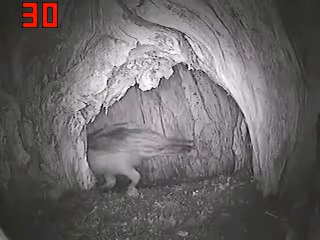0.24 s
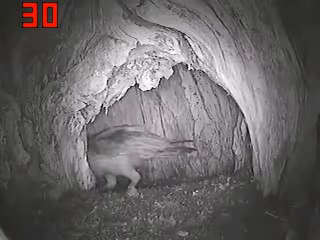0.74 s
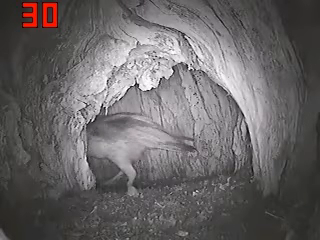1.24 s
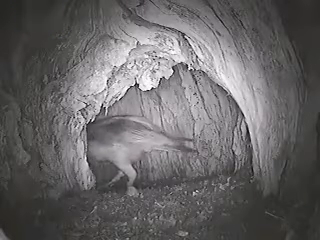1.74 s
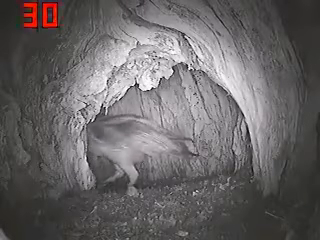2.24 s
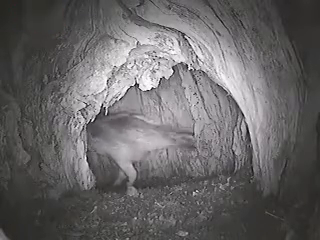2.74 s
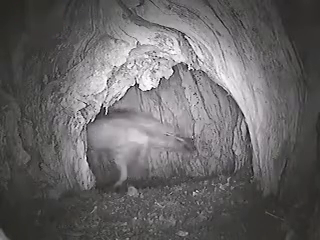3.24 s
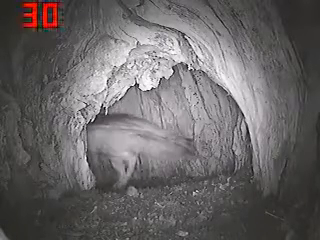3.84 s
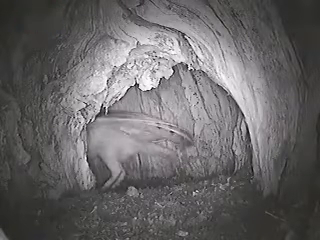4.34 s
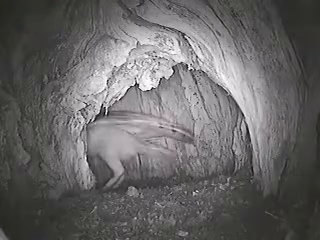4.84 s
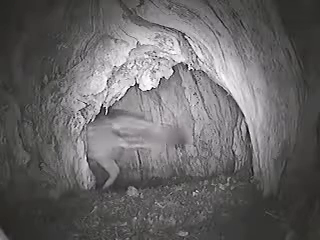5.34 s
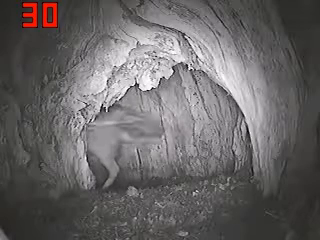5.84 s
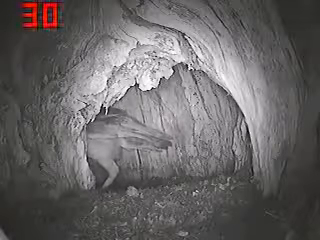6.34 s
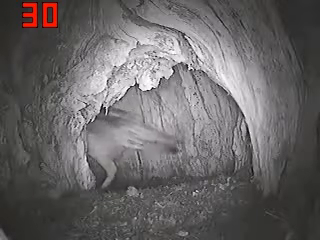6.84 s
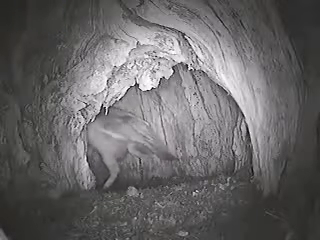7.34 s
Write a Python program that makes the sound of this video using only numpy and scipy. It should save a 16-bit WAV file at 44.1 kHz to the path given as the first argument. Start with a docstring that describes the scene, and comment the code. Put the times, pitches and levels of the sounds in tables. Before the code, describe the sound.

Inside a hollow tree, two barn owls beg with harsh, raspy hisses, picked up closely by a small camera microphone with limited treble and slightly squashed peaks. A hiss is already under way at the start and ends by about 0.3 seconds. Loud and soft owls hiss nearly together at 0.8 and 1.9 seconds, each call about half a second, swelling and brightening before stopping abruptly. The thinner owl leads at 2.9, overlapped by the loud one at 3.2. From about 3.6 to 5 seconds the sound turns hollow and whistly, with thin sliding tones, strongest around 4.4 to 4.9 during another overlapping pair. The soft owl hisses alone at 5.2, the loud one at 6.1 with the soft overlapping from 6.3, and a last loud hiss starts at 7.3. A short woody tail follows each; a low, watery, flickering hush with faint hum fills the gaps.

```python
"""Two barn owls begging in a hollow tree

Two barn owls beg with harsh hisses, made of noise shaped by throat resonances, near a small nest camera.
The louder owl's hisses swell as its resonances rise; a softer, thinner owl overlaps and follows.
For a while the hisses sound hollow and whistly, with thin tones, some sliding. The wooden hollow adds
a short tail to the hisses. Filtered noise hushes behind them with a trace of hum, and the camera's
input flattens the loudest peaks."""
import sys
import numpy as np
from scipy import signal
from scipy.io import wavfile
from scipy.ndimage import uniform_filter1d

SR = 44100
rng = np.random.default_rng(int(sys.argv[2]) if len(sys.argv) > 2 else 0)


def store_wav(level_fs):
    """Save 16-bit WAV to argv[1]."""
    pcm = np.round(np.clip(np.atleast_2d(level_fs), -1, 1) * 32767)
    wavfile.write(sys.argv[1], SR, pcm.T.astype(np.int16))


N = 334278  # length in samples
FRAME, HOP = 2048, 512  # samples per slice of sound, and samples from one slice to the next
FRAME_S = np.arange(N // HOP + 3) * HOP / SR
BIN_HZ = np.fft.rfftfreq(FRAME, 1 / SR)
SHOULDER_HZ, EDGE_HZ = 7300, 8010  # where the treble drops to a faint shoulder, and where it ends


def gain_of(db):
    """Decibels to amplitude."""
    return 10 ** (np.asarray(db) / 20)


def evened(x):
    """Scales to an rms of 1."""
    return x / np.sqrt(np.mean(x ** 2) + 1e-20)


def read(points, hz):
    """A curve in dB over pitch, joined on a log-frequency axis."""
    point_hz, db = np.transpose(points)
    return np.interp(np.log(hz + 1), np.log(point_hz + 1), db)


def curve(points, t):
    """A control curve, joined by straight lines in time."""
    return np.interp(t, *np.transpose(points))


def wobble(count, size):
    """Smooth random drift of rms 1: noise averaged twice over `size` points."""
    noise = rng.standard_normal(count)
    return evened(uniform_filter1d(uniform_filter1d(noise, size), size))


def patches(abruptness, rarity):
    """Narrow patches of pitch that switch on (+1) and off (-1) at random (frames x bins)."""
    field = rng.standard_normal((len(FRAME_S), len(BIN_HZ)))
    field = uniform_filter1d(field, size=7, axis=0)
    field = evened(uniform_filter1d(field, size=3, axis=1))
    return np.tanh(abruptness * (field - rarity))


def turbulence(colour):
    """Noise of even power whose spectrum follows colour (frames x bins)."""
    white = rng.standard_normal((len(FRAME_S) - 1) * HOP)
    slices = signal.stft(white, nperseg=FRAME, noverlap=FRAME - HOP)[2]
    colour = colour / np.sqrt(np.mean(colour ** 2, axis=1, keepdims=True))
    return signal.istft(slices * colour.T, nperseg=FRAME, noverlap=FRAME - HOP)[1][:N]


def add(mix, s, sound):
    """Mixes a sound in at time s, in seconds."""
    part = mix[round(s * SR):][:len(sound)]
    part += sound[:len(part)]


# The tone colour of the steady hush. Each row: pitch in Hz, relative strength in dB per Hz.
HUSH_COLOUR = [(20, -7.5), (60, -0.5), (150, -9), (300, -6.5), (480, -2), (700, 0), (1000, -2), (1280, -7),
               (1600, -4.5), (2350, -4.5), (3200, -17), (4700, -18.5), (5300, -26), (7200, -23.5)]
# How deeply the hush flickers. Each row: pitch in Hz, flicker depth in dB.
FLICKER_DEPTH = [(60, 5), (200, 14), (400, 8.5), (750, 3), (1300, 10), (2200, 7), (3200, 15), (7000, 12)]
# Brief dips of the hush. Each row: middle in seconds, half length in seconds, depth in dB.
HUSH_DIPS = [(3.709, .045, 12), (4.19, 0.11, 11), (4.5, 0.32, 6), (4.865, 0.045, 11), (5.409, 0.029, 16.5),
             (5.537, 0.029, 14), (5.74, 0.039, 14), (6.706, .02, 9)]


def background():
    """A low hush that flickers in narrow, watery patches and dips briefly, with a wavering trace of mains hum."""
    hush_db = -50.5
    hum_hz, hum_db = 60, -69  # hum level before it wavers
    t = np.arange(N) / SR
    flicker_db = read(FLICKER_DEPTH, BIN_HZ) * (patches(abruptness=6.0, rarity=0.43) - .5)
    colour = gain_of(read(HUSH_COLOUR, BIN_HZ) + flicker_db) * (BIN_HZ < EDGE_HZ)
    hush = gain_of(hush_db) * turbulence(colour)
    dip_db = sum(depth_db * np.exp(-((t - middle) / half) ** 2) for middle, half, depth_db in HUSH_DIPS)
    waver = 1 + .5 * wobble(N, size=2500)
    hum = gain_of(hum_db) * waver * np.sin(2 * np.pi * hum_hz * t)
    return hush * gain_of(-dip_db) + hum


# Thin tones that come and go. Each row: start in seconds, length in seconds, pitch at the middle in Hz,
# glide in Hz per second, level at the middle in dB before it shakes.
THIN_WHISTLES = [ (3.61, 0.044, 6790, 1, -44), (3.625, 0.051, 5400, -1, -38),
                 (3.631, 0.068, 3470, -600, -37), (3.654, 0.086, 2660, -1000, -47.5),
                 (4.059, 0.26, 711, 61, -59.5), (4.278, .09, 885, 300, -58), (4.335, .06, 3490, 500, -45),
                 (4.339, .06, 5930, 3, -42.5), (4.345, 0.067, 5690, -2, -42), (4.38, 0.089, 3750, 0, -41),
                 (4.409, 0.11, 2566, -600, -42), (4.431, .06, 3930, -2, -36.5), (4.498, .06, 5700, 2, -38),
                 (4.50, 0.13, 2593, 600, -35.5), (4.531, .15, 2700, 700.5, -32),
                 (4.571, 0.089, 5880, -500, -38.5), (4.619, .14, 2680, 599.5, -35),
                 (4.66, .16, 2797, 800.5, -33.5), (4.73, 0.085, 2970, 2, -39), (4.787, 0.063, 3920, 1, -39),
                 (4.78, .06, 3730, -1, -37), (4.807, 0.071, 2716, -1500, -38), (4.817, 0.049, 3580, 1, -37),
                 (4.82, .055, 5980, 0, -42), (5.72, 0.097, 715, -2, -56.5)]


def whistles():
    """Thin, unsteady tones; each swells and fades, its pitch held or sliding."""
    waver, shake = .003, .35  # rms unsteadiness of pitch and of level, as fractions
    fade_db = 10.5  # how far a whistle is below its peak at its start and end
    out = np.zeros(N)
    t = np.arange(-SR // 4, SR // 4) / SR  # time from the middle of a whistle
    for start, length, pitch_hz, glide, db in THIN_WHISTLES:
        hz = (pitch_hz + glide * t) * (1 + waver * wobble(len(t), size=300))
        level = gain_of(db - fade_db * (2 * t / length) ** 4)
        level = level * (1 + shake * wobble(len(t), size=300))
        tone = np.sin(2 * np.pi * np.cumsum(hz) / SR)
        add(out, start + length / 2 + t[0], level * tone)
    return out


def effort(hisses, t, swell_db, attack_db_per_s, release_db_per_s):
    """Blowing strength in dB: a quick start, a swell that levels off at the peak, a quick release."""
    each = []
    for start, length, peak_db, _ in hisses:
        still_to_swell = (1 - np.clip((t - start) / length, 0, 1)) ** 2
        before_s = np.maximum(start - t, 0)
        after_s = np.maximum(t - start - length, 0)
        each.append(peak_db - swell_db * still_to_swell
                    - attack_db_per_s * before_s - release_db_per_s * after_s)
    return np.maximum(np.max(each, axis=0), -120)


def tilt(hisses, t):
    """Each hiss keeps its own treble tilt, in dB per octave."""
    start, length, _, slope = np.transpose(hisses)
    nearest = np.argmin(abs(t[:, None] - start - length / 2), axis=1)
    return slope[nearest]


# How hollow and whistly the hisses sound. Each row: time in seconds, hollowness from 0 to 1.
HOLLOW_CURVE = [(3.595, 0), (3.635, 1), (4.05, 0.5), (4.33, 0.8), (4.45, 0.8), (4.88, 0.57), (5.15, 0)]


def owl(hisses, throat, rush, full_db, swell_db, attack_db_per_s, release_db_per_s, rise, blur, rasp,
        rush_loss_db=19, streak_db=9, grain_db=2):
    """Turbulent air through a throat whose resonances climb and stand out more with effort."""
    t = np.arange(N) / SR
    effort_db = effort(hisses, t, swell_db, attack_db_per_s, release_db_per_s)
    slack_db = np.clip(full_db - np.interp(FRAME_S, t, effort_db), 0, 10)[:, None]
    hollowness = np.clip(curve(HOLLOW_CURVE, FRAME_S), 0, 1)[:, None]
    slack_db = slack_db * (1 - hollowness)  # a hollow hiss keeps its sharp resonances when soft
    hz = BIN_HZ * (1 + rise * slack_db)  # reading the curves higher up places the resonances lower
    ring_power = sum(gain_of(db + change * hollowness) ** 2 / 2 ** ((2 * (hz - f) / width) ** 2)
                     for f, width, db, change in throat)
    # in a hollow hiss the broad rush sinks and the sound breaks into thin streaks
    streaks = hollowness * patches(abruptness=3.3, rarity=0.4)
    rush_db = read(rush, hz) + blur * slack_db
    breadth = gain_of(rush_db + streak_db * streaks - rush_loss_db * hollowness)
    octaves_up = np.log2(np.maximum(BIN_HZ / 2000, 1))
    tilt_db = tilt(hisses, FRAME_S)[:, None] * octaves_up
    hiss = turbulence(np.sqrt(ring_power + breadth ** 2) * gain_of(tilt_db + grain_db * streaks))
    flutter = np.exp(rasp * wobble(N, size=120))  # the jet flaps unevenly
    return hiss * evened(flutter) * gain_of(effort_db)


# The soft owl's hisses, often half hidden under the loud one's. Each row: start in seconds,
# length in seconds, peak effort in dB, treble tilt above 2000 Hz in dB per octave.
SOFT_OWL_HISSES = [ (-0.2, 0.49, -34, 0.61), (0.8, 0.5, -37, .5), (1.85, 0.5, -38, 0),
                   (2.91, 0.53, -36, 0.077), (4.09, 0.46, -39, 0.051), (5.215, 0.49, -35, 0),
                   (6.29, 0.5, -36, 0)]
# Its throat resonances at full effort. Each row: pitch in Hz, width at half power in Hz,
# relative strength in dB, change in dB when fully hollow.
SOFT_OWL_THROAT = [(2980, 210, -16.5, -10), (4224, 120, -1.5, -1), (4596, 330, 0, -7.5),
                   (5250, 330, -4, -8.5), (5830, 680, -8, -13)]
# Its broad rush of air at the beak. Each row: pitch in Hz, relative strength in dB per Hz.
SOFT_OWL_RUSH = [(60, -51.5), (2600, -35.5), (3000, -15.5), (3850, -15), (4300, -8), (5800, -7.5),
                 (6200, -14), (7300, -13)]


def soft_owl():
    """The thinner owl: a gentle swell, and resonances that hardly move with effort."""
    return owl(SOFT_OWL_HISSES, SOFT_OWL_THROAT, SOFT_OWL_RUSH, full_db=-36.5, swell_db=7.5,
               attack_db_per_s=398, release_db_per_s=200, rise=0.00089, blur=0.11, rasp=0.054)


# The loud owl's hisses. Each row: start in seconds, length in seconds,
# peak effort in dB before the mix adds its boost, treble tilt above 2000 Hz in dB per octave.
LOUD_OWL_HISSES = [ (-0.25, 0.45, -23, 0), (0.775, 0.45, -22.5, 0), (1.86, 0.43, -24, 0),
                   (3.2, 0.46, -23.5, -1), (4.41, 0.43, -24, 1), (6.115, 0.43, -25.5, -1.5),
                   (7.335, 0.47, -24, -1)]
# Its throat resonances at full effort. Each row: pitch in Hz, width at half power in Hz,
# relative strength in dB, change in dB when fully hollow.
LOUD_OWL_THROAT = [(2715, 168, -7, -11), (4294, 240, 1, -1), (4680, 480, -4.5, 1), (5250, 480, -3.5, 0),
                   (6746, 250, -11, 1.5)]
# Its broad rush of air at the beak. Each row: pitch in Hz, relative strength in dB per Hz.
LOUD_OWL_RUSH = [(60, -46), (1200, -37.5), (2250, -26.5), (2650, -11.5), (3200, -15), (3650, -11),
                 (4000, -6), (5000, -14), (5800, -9.5), (6300, -14), (7300, -19)]


def loud_owl():
    """The main owl: a strong swell, and resonances that climb and stand out with effort."""
    return owl(LOUD_OWL_HISSES, LOUD_OWL_THROAT, LOUD_OWL_RUSH, full_db=-24.5, swell_db=12.5,
               attack_db_per_s=450, release_db_per_s=396, rise=0.0047, blur=0.56, rasp=0.05)


def cavity(x, wet_db):
    """Close wooden walls return a short, dense tail."""
    t60 = .15  # seconds for the tail to fall by 60 dB
    t = np.arange(SR // 4) / SR
    taps = rng.standard_normal(len(t)) * (t > .003) * gain_of(-60 * t / t60)
    tail = signal.fftconvolve(x, taps / np.linalg.norm(taps))[:N]
    return x + gain_of(wet_db) * tail


def scene():
    """Both owls in the tree, heard by one microphone and sent alike to both channels."""
    owls = gain_of(0.5) * loud_owl() + soft_owl()
    mono = cavity(owls, wet_db=-8) + whistles() + background()
    return np.array([mono, mono])


def record(dry, ceiling_db=-17.0, lopsided_db=1, knee=5, shoulder_db=-26):
    """The camera's input rounds off peaks a little lopsidedly; its treble drops to a faint shoulder, then ends."""
    ceiling = gain_of(ceiling_db + lopsided_db * np.sign(dry))
    rounded = dry / (1 + abs(dry / ceiling) ** knee) ** (1 / knee)
    rounded = signal.sosfilt(signal.butter(2, 20, "highpass", fs=SR, output="sos"), rounded)
    main = signal.firwin(2047, SHOULDER_HZ, window=("kaiser", 9), fs=SR)
    fringe = signal.firwin(2047, EDGE_HZ, window=("kaiser", 9), fs=SR)
    lowpass = main + gain_of(shoulder_db) * (fringe - main)
    return signal.oaconvolve(rounded, lowpass[None], "same")


dry = scene()
out = record(dry)
store_wav(out)
```